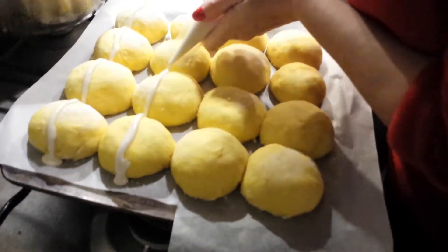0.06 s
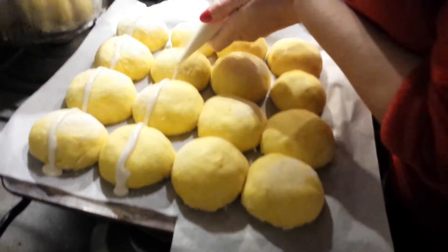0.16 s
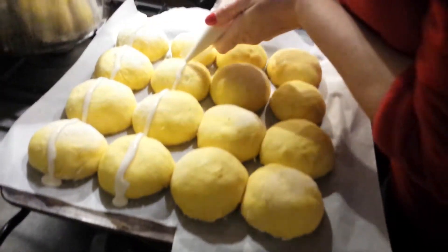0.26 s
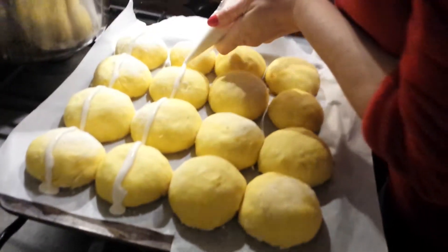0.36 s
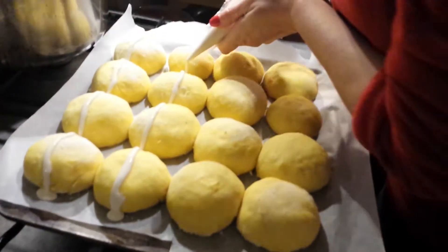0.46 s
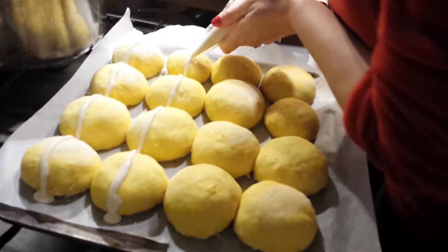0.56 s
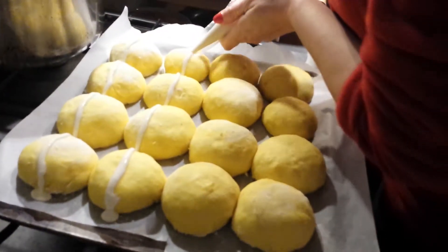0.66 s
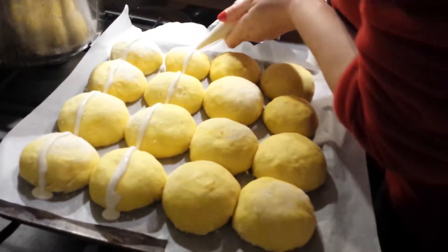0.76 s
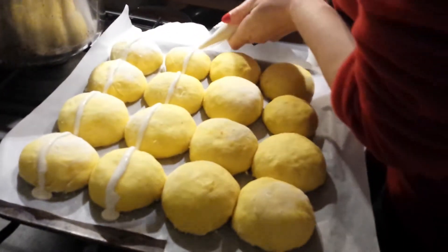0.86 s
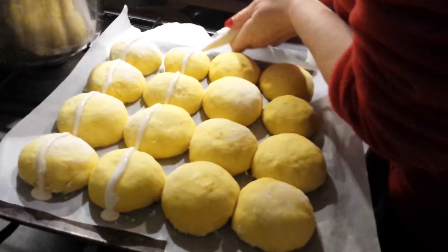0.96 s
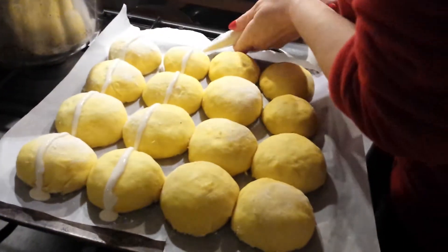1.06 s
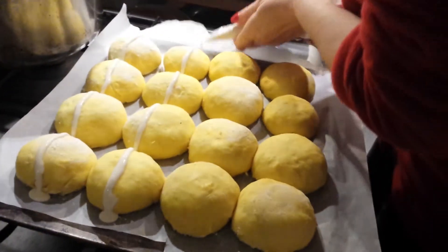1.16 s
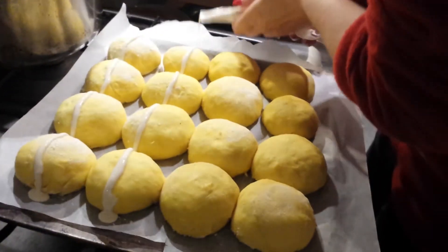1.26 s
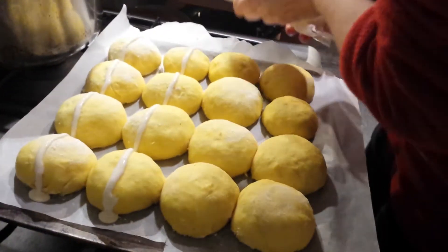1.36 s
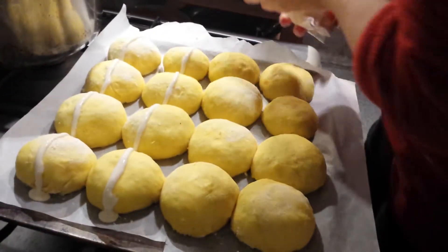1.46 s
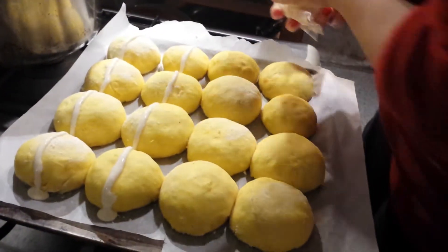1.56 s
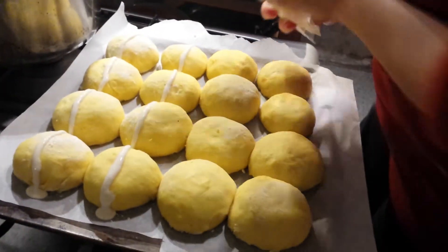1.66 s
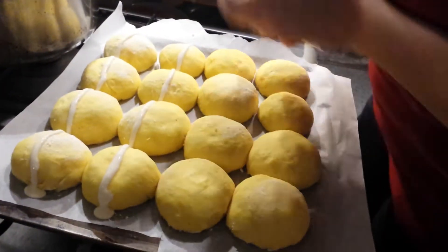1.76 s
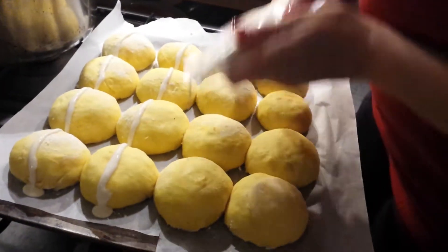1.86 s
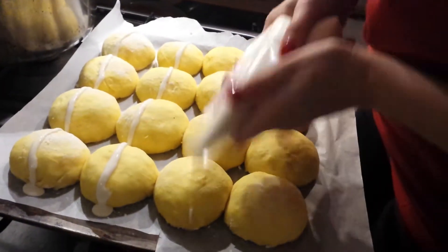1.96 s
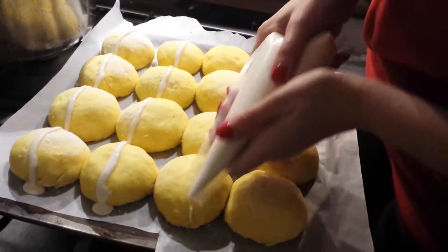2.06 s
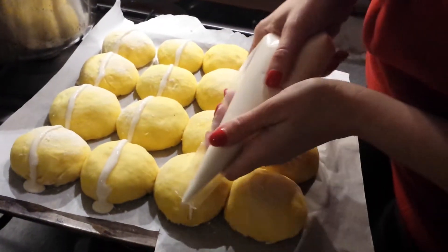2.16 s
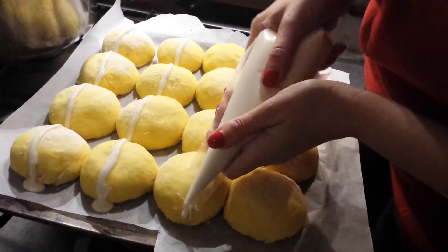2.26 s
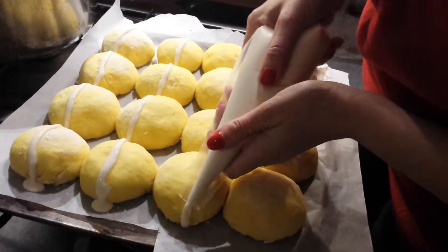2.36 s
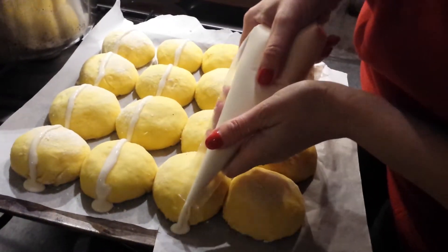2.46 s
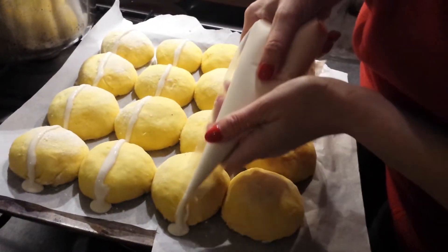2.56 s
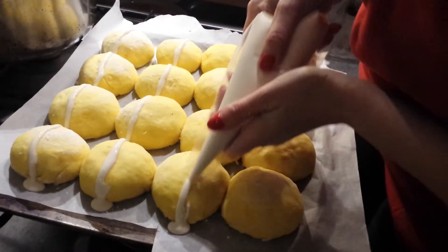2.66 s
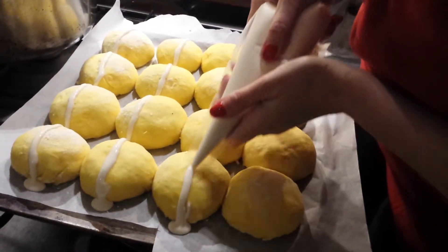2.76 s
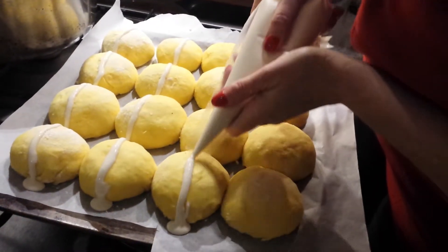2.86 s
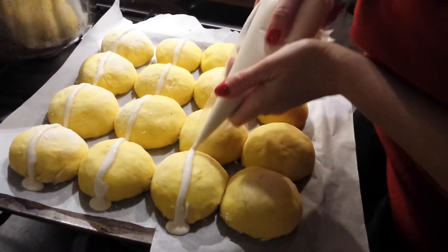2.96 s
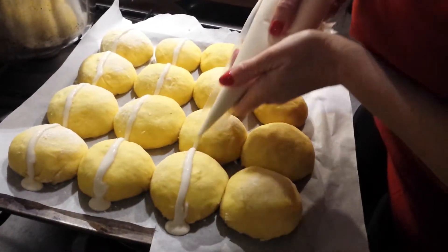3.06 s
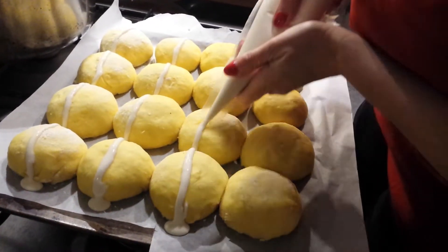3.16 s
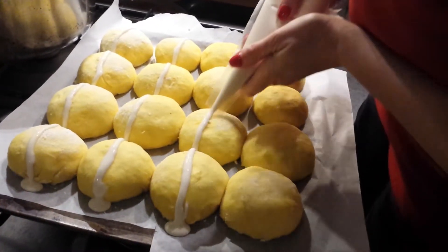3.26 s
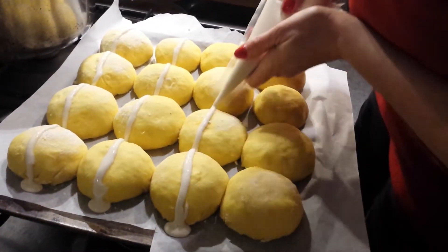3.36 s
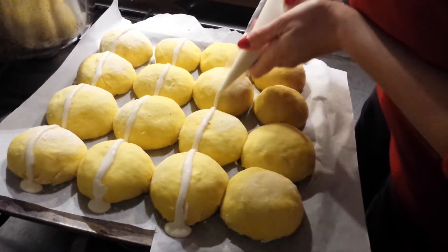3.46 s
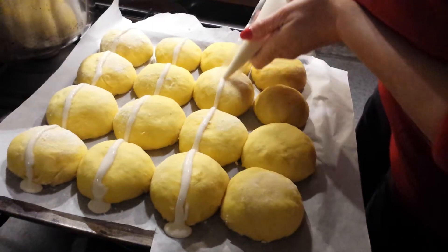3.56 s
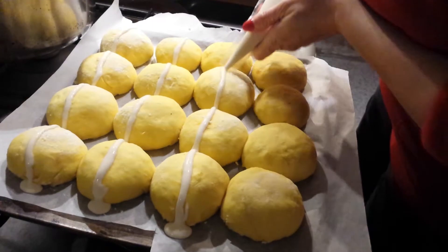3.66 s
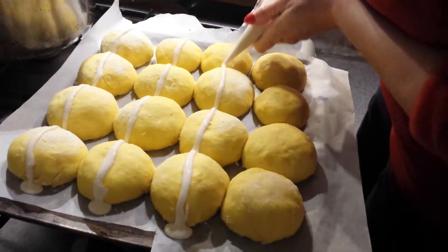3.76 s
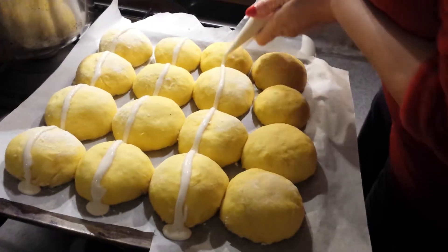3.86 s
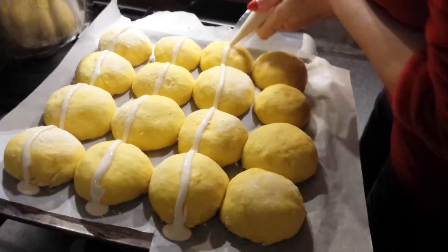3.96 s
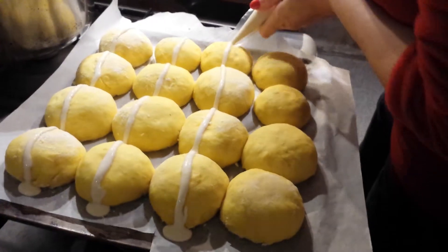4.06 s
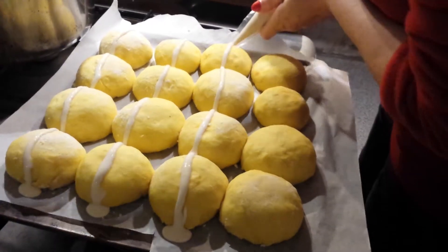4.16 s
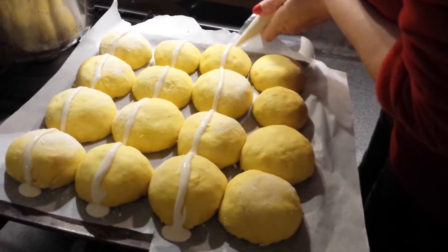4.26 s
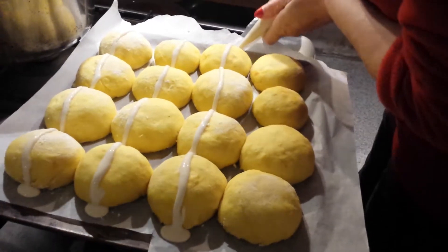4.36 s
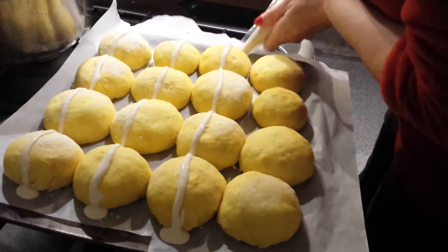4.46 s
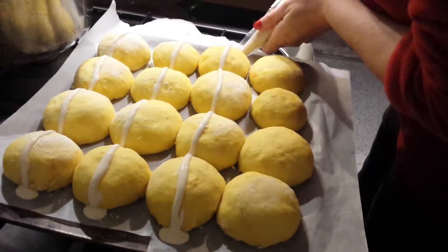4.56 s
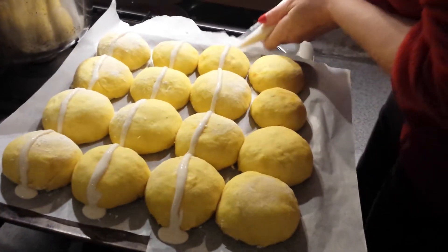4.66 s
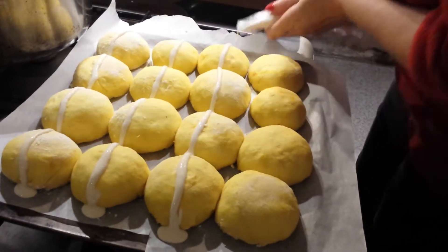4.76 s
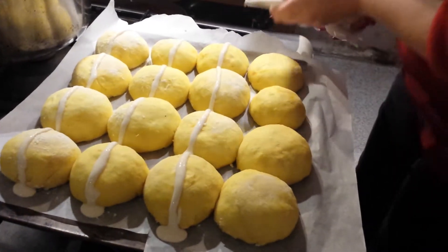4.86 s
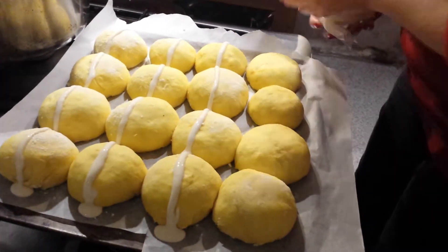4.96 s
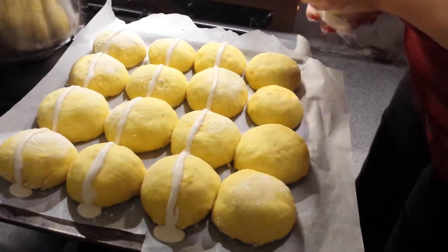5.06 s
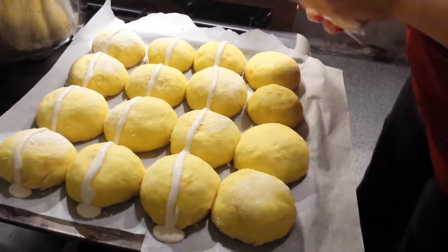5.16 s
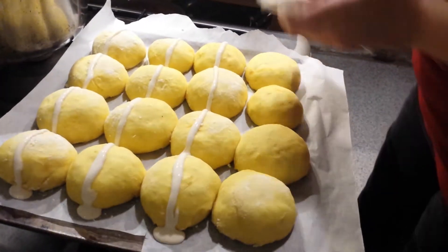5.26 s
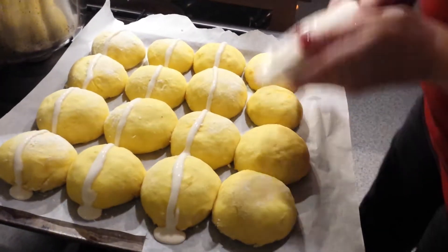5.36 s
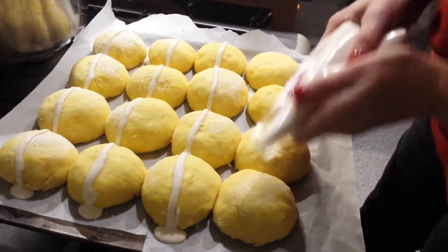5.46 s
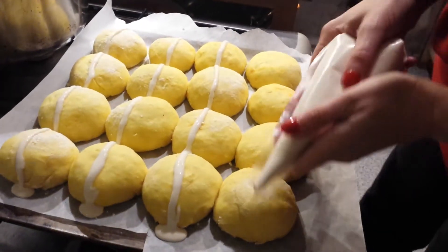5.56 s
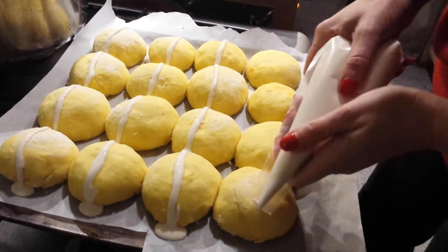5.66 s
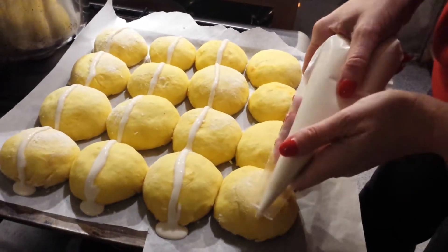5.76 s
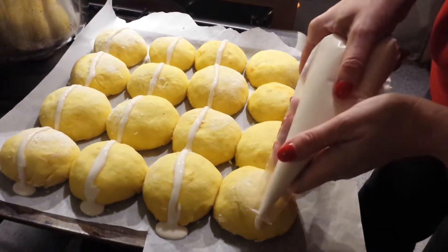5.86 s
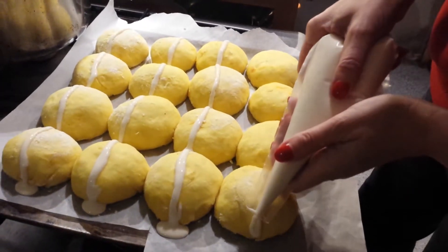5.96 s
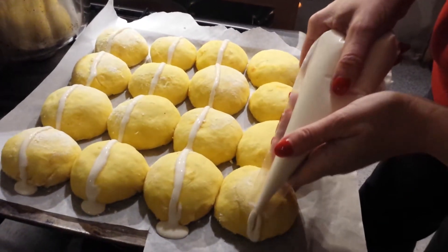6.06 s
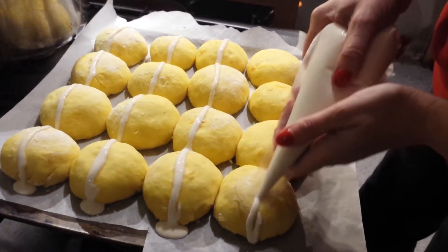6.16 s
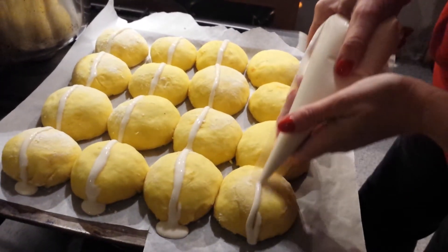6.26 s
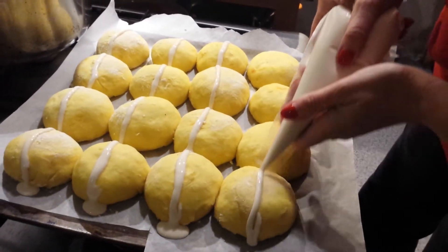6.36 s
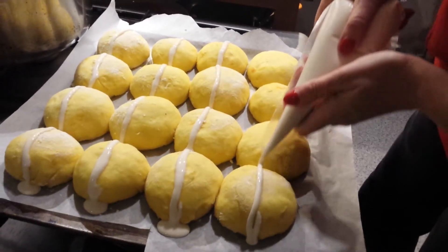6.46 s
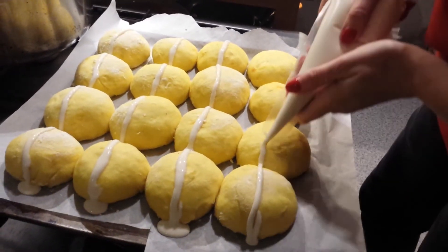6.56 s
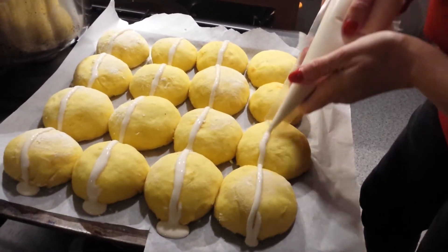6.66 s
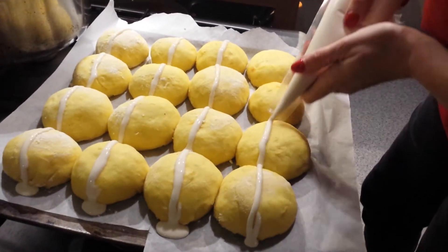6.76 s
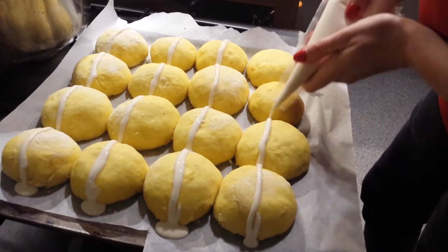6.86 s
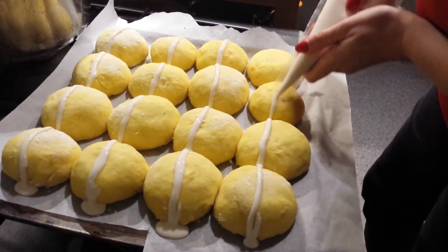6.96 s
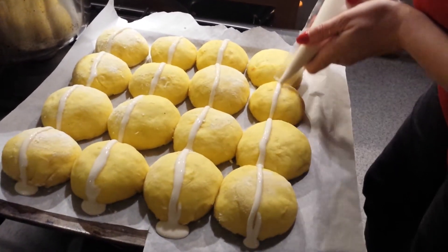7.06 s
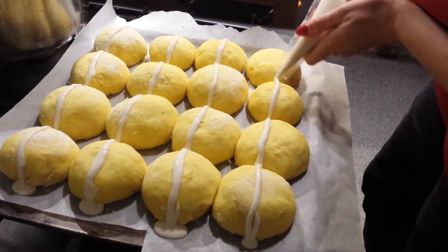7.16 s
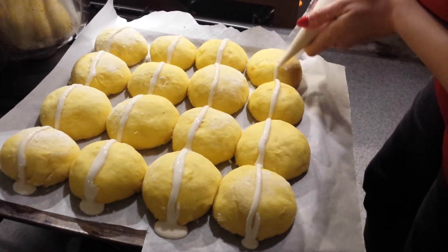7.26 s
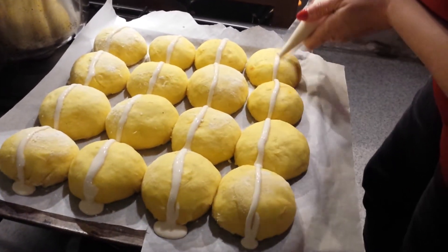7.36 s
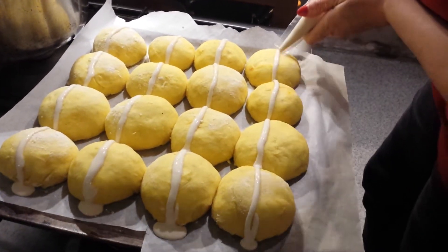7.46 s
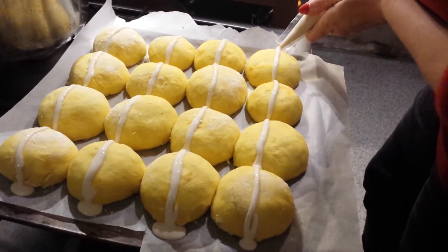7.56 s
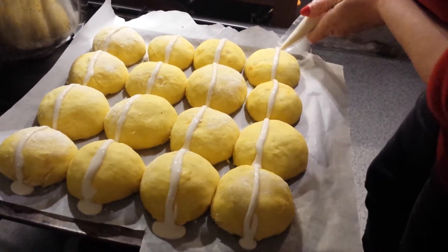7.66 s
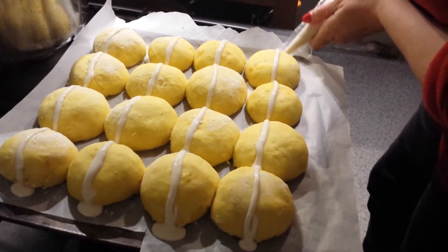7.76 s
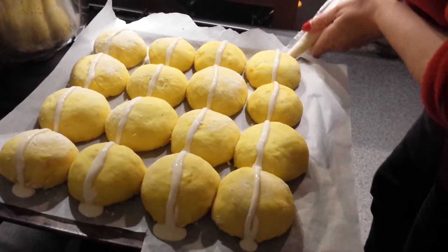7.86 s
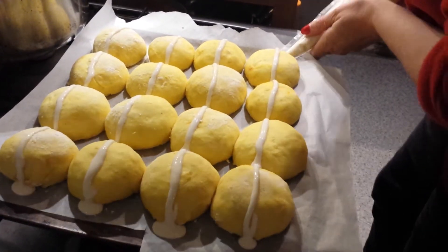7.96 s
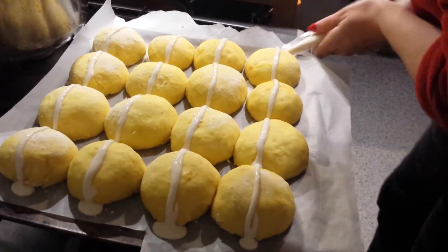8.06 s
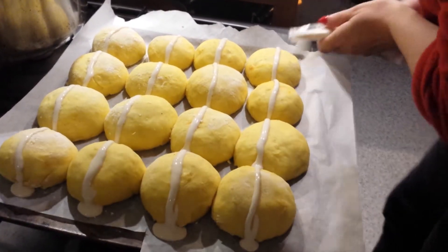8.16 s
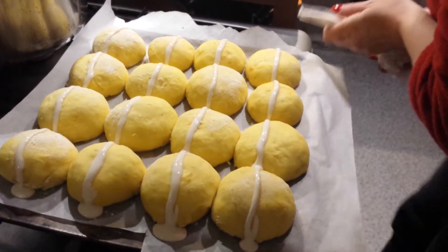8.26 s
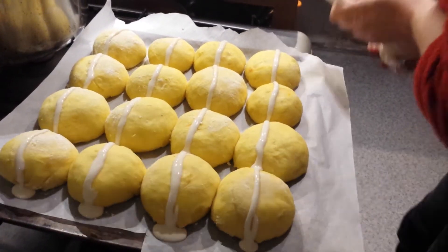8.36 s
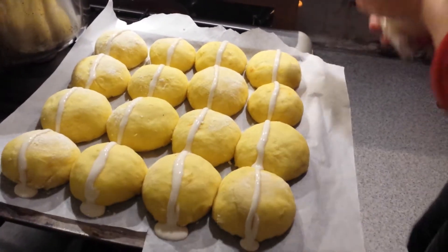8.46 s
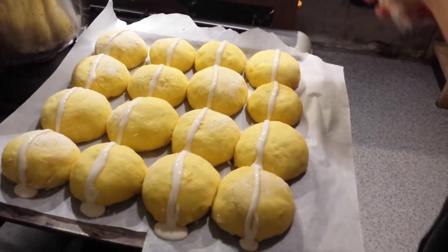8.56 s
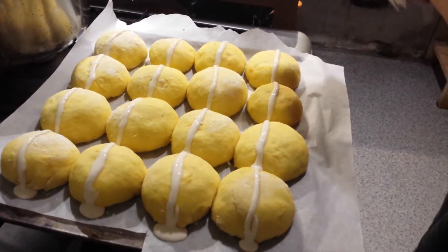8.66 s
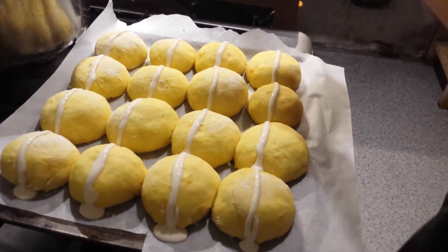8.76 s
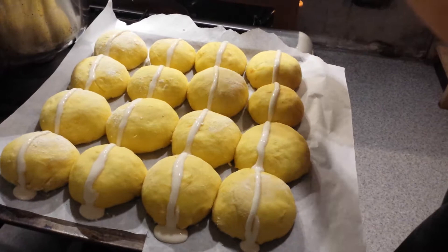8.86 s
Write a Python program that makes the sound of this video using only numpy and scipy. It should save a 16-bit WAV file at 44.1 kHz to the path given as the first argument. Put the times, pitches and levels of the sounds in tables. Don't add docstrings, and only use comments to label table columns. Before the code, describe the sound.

A quiet kitchen, heard close in stereo, with a faint mains motor hum and soft room tone that swell slightly when something moves. From 0 s, small plastic ticks and soft sleeve swishes. At about 1 to 1.3 s a short squeeze of plastic film crackles, one sharp crack over fine creasing. Sparse ticks and light cloth brushing follow, with a very soft worktop bump at 3.2 s. From 4.4 to 4.9 s a longer squeeze produces a dense run of bright cracks and crinkles; baking paper scrapes at 5.1 s and a dry snap follows at 5.25 s. Between 5.4 and 7.6 s only faint ticks, a light paper brush and gentle swishes. Crinkling returns at 7.9 s with a snap, building to the strongest, sharpest crackles around 8.15 to 8.3 s with a dull low thud. Paper drags briefly at 8.6 to 8.8 s, with last tiny ticks.

```python
import sys
import numpy as np
from scipy import signal
from scipy.fft import rfft, irfft
from scipy.io import wavfile
from scipy.ndimage import uniform_filter1d

SR = 44100
rng = np.random.default_rng(int(sys.argv[2]) if len(sys.argv) > 2 else 0)


def undo_db(level):
    steps = np.asarray(level, float) / 20
    return 10 ** steps


def transcribe(signal):
    frames = np.atleast_2d(signal).T
    limited = np.clip(frames, -1, 1)
    pcm = np.round(limited * 32767).astype(np.int16)
    wavfile.write(sys.argv[1], SR, pcm)


N = 392490
T = np.arange(N) / SR

# time in seconds, level at twice the mains in dB.
GATE_LEVEL = [(0.0, -78), (0.07, -74), (0.69, -84.5), (1.14, -69), (1.76, -84), (2.08, -78), (2.77, -80.5),
              (3.27, -74), (3.79, -83), (4.46, -72), (5.28, -71), (6.07, -86), (6.29, -78), (7.11, -78.5),
              (8.38, -67.5), (8.45, -71), (8.78, -65.5), (8.9, -76)]
# multiple of the mains frequency, level in dB.
HUM_PARTIALS = [(1, -3.5), (2, 0), (3, -5.5), (4, -8), (5, -16.5), (6, -10), (7, -12.5), (8, -12.5),
                (12, -12), (13, -11)]
# frequency in Hz, density in dB per Hz.
ROOM_COLOUR = [(18, -22), (30, -2), (48, -16.5), (86, -5.5), (161, -9.5), (540, -14.5), (649, -17),
               (866, -16.5), (2060, -15.5), (3220, -21), (5590, -19.5), (14800, -27), (16000, -27.5)]
# frequency in Hz, left minus right in dB.
PORT_LEAN = [(60, -7), (110, 0), (200, 3), (380, 15), (700, 4), (1290, 0.5), (2380, 10.5), (4400, 8.5),
             (8120, -4.5), (15000, -23.5)]
# frequency in Hz, density in dB per Hz.
SLEEVE_COLOUR = [(290, -27), (500, -16), (1350, -3), (1960, 4), (2900, -3), (3900, -17.5), (4670, -8),
                 (6120, -4.5), (15000, -16.5)]
# frequency in Hz, density in dB per Hz.
PAPER_COLOUR = [(290, -51), (500, -25), (800, -6.5), (1160, -8), (2230, 2), (3770, -9.5), (4230, -6.5),
                (5860, -0.5), (14000, -29.5), (15000, -32)]
# frequency in Hz, density in dB per Hz.
FILM_COLOUR = [(59, -36), (100, -12.5), (229, -12), (365, -24), (481, 6.5), (768, -11.5), (891, 2),
               (1170, -3), (1390, 4), (2860, -2.5), (5650, 2.5), (12900, -17), (16000, -22)]
# start in seconds, hold in seconds, dull level in dB,
# change over the hold in dB, bright minus dull in dB.
SLEEVE_SWISHES = [(0.04, 0.029, -66.5, -6, -8.5), (0.335, 0.038, -68, -6, -9),
                  (0.675, 0.39, -79.5, -3, 6.5), (1.72, 0.26, -78, -10, 4.5), (2.765, .17, -69, -8, -2),
                  (3.2, 0.09, -66, -8, -18), (3.595, 0.15, -82, 9, 8), (4.045, 0.28, -79.5, 0.5, 7),
                  (6.23, 0.15, -74, 6, 2), (7.12, 0.027, -70, -2.5, 3.5), (7.42, 0.21, -78.5, -5.5, 6),
                  (7.852, .24, -74, -3, 16)]
# time in seconds, peak in dB, pitch in Hz, 60 dB decay in seconds.
WORKTOP_BUMPS = [
    (3.197, -54, 231, 0.64),
    (3.21, -57, 456, 0.39),
    (3.288, -57, 258, .1),
    (8.23, -37.5, 237, 0.095),
    (8.241, -48.5, 69, 0.23),
    (8.253, -40.5, 471, 0.11),
    (8.36, -56, 288, 0.5),
]
# start in seconds, hold in seconds, dull level in dB,
# change over the hold in dB, bright minus dull in dB.
PAPER_DRAGS = [
    (5.12, 0.037, -55, -3, 8.5),
    (5.17, 0.091, -64, 0, 2),
    (5.675, 0.059, -68.5, 2.5, 8.5),
    (8.605, 0.075, -55, 0.5, -1),
    (8.67, 0.02, -54, 1, 6),
    (8.72, 0.076, -54.5, -1, 0),
]
# start in seconds, hold in seconds, dull creases in dB,
# change over the hold in dB, bright minus dull in dB.
FILM_CRUMPLES = [(0.93, 0.16, -74, 9.5, -1), (1.065, 0.091, -57.5, -7.5, 4.5), (1.21, .07, -57, -10, 2),
                 (4.3, 0.17, -77.5, 4.5, 5.5), (4.45, .08, -57, -7.5, 9), (4.535, .08, -55, 0, 5),
                 (4.615, 0.081, -49, -12, 4.5), (4.7, .15, -55, 4, -4), (4.86, 0.1, -64.5, -4, 4.5),
                 (5.0, 0.1, -78.5, 9, 1.5), (5.245, .04, -66, -10, -6), (7.853, 0.065, -64.5, 1.5, 2),
                 (7.92, .18, -63, -1.5, 1), (8.104, 0.059, -62.5, 8, 6), (8.175, 0.092, -52.5, -4, 3.5),
                 (8.25, 0.06, -50.5, -2, 8)]
# time in seconds, peak in dB, ringing in Hz, dull part in dB.
LONE_TICKS = [(0.0136, -50, 1260, -65), (0.0347, -70, 1440, -61), (0.0597, -41, 1330, -51.5),
              (0.351, -69, 1680, -64), (0.809, -71, 2300, -60), (1.509, -66, 1390, -58),
              (2.3472, -74, 840, -60.5), (2.4282, -48.5, 910, -61.5), (2.839, -57, 3750, -72),
              (2.8749, -48, 1950, -50.5), (2.9807, -43, 940, -46.5), (3.514, -73, 1980, -60),
              (3.5973, -54, 1880, -50), (4.327, -45.5, 2030, -56), (5.3646, -56, 2570, -49.5),
              (5.6181, -54, 1877, -72), (5.689, -66, 2620, -65), (5.9489, -61.5, 2050, -82),
              (6.0681, -62, 7390, -84), (6.122, -50, 2350, -54.5), (6.3768, -52, 2000, -55),
              (6.5834, -57, 6420, -78), (6.9124, -64, 1600, -56.5), (7.4057, -48.5, 1320, -59),
              (7.5288, -56, 5540, -75.5), (7.5565, -55, 6300, -68), (8.5145, -57, 6500, -75),
              (8.74, -60, 1300, -52), (8.7994, -46, 2420, -59), (8.8344, -58, 1880, -76)]
# time in seconds, peak in dB, ringing in Hz, dull part in dB.
DRY_SNAPS = [
    (4.596, -24, 4900, -29.5),
    (4.5794, -25, 4400, -32),
    (5.2405, -28, 5800, -35),
    (7.9117, -30.5, 3140, -44),
    (8.14, -26, 6300, -32.5),
]
# time in seconds, peak in dB, ringing in Hz, dull part in dB.
FIRST_BUCKLES = [
    (1.005, -48, 5830, -65),
    (1.0555, -47, 1460, -41),
    (1.062, -23, 4750, -28),
    (1.0866, -27.5, 1500, -31),
    (1.117, -46, 1450, -41),
    (1.2108, -34, 5060, -39),
    (1.2299, -36.5, 990, -39.5),
    (1.2464, -41, 880, -39),
    (1.3174, -51, 5100, -59),
]
SECOND_BUCKLES = [(4.4266, -42.5, 5620, -45.5), (4.4488, -50, 1850, -40), (4.4585, -21.5, 5730, -31),
                  (4.4747, -39, 4880, -45), (4.5327, -26, 2020, -29), (4.5416, -16.5, 4300, -36),
                  (4.5624, -28, 4100, -53), (4.6135, -21.5, 2400, -26), (4.6175, -19, 6300, -25.5),
                  (4.679, -39, 2240, -32.5), (4.7044, -30.5, 1560, -30.5), (4.7341, -36, 815, -31.5),
                  (4.7511, -25, 6360, -32.5), (4.7623, -51, 1660, -41), (4.7797, -28, 5900, -36),
                  (4.786, -26.5, 1900, -30.5), (4.7905, -22, 5700, -25.5), (4.818, -43, 950, -31.5),
                  (4.8442, -26, 5600, -31), (4.8536, -33.5, 5430, -28)]
RELEASE_BUCKLES = [
    (4.8895, -47, 5360, -51),
    (5.018, -53, 5540, -70),
    (5.0285, -51.5, 5670, -56.5),
    (5.0793, -50, 5630, -60),
    (5.1217, -40.5, 5800, -69),
    (5.2574, -50, 1960, -51),
]
THIRD_BUCKLES = [(7.8544, -49, 5070, -49), (7.95, -42, 1510, -40.5), (7.9985, -53, 1430, -45),
                 (8.024, -52, 2280, -43.5), (8.0385, -46, 1550, -43.5), (8.106, -37, 5700, -48),
                 (8.1281, -33, 1780, -40), (8.1625, -25.5, 2110, -31), (8.1884, -37, 1340, -36),
                 (8.2285, -21, 5900, -27), (8.232, -17.5, 5600, -21.5), (8.241, -23, 3980, -22.5),
                 (8.2547, -15, 6100, -25), (8.2635, -29, 5350, -24), (8.2824, -31, 1400, -41),
                 (8.2897, -25, 6500, -30), (8.3398, -39, 2100, -40)]

MAINS_HZ = 49.95
BODY_HZ, DULL_HZ, BRIGHT_HZ = (130, 800), (600, 3400), (3400, 17000)
SNAP_HZ, AIR_HZ = (3600, 9000), (9000, 17000)


def unit(x):
    return x / np.sqrt(np.mean(x ** 2))


def peak(x):
    return x / np.max(np.abs(x))


def band(x, edges_hz):
    return signal.sosfilt(signal.butter(2, edges_hz, "bandpass", fs=SR, output="sos"), x)


def lowpass(x, order, hz):
    return signal.sosfilt(signal.butter(order, hz, fs=SR, output="sos"), x)


def read_curve(rows):
    hz, db = np.array(rows).T
    return np.interp(np.log(np.arange(1, 1026) * SR / 2048), np.log(hz), db)


def colour(x, table, sides=0):
    db = read_curve(table) + sides * np.array([[0.5], [-0.5]]) * read_curve(PORT_LEAN)
    cepstrum = irfft(db * np.log(10) / 20)
    cepstrum[:, 1:1024] *= 2
    cepstrum[:, 1025:] = 0
    response = irfft(np.exp(rfft(cepstrum)))
    return signal.fftconvolve(x, response, axes=1)[:, :N]


def walk(rate):
    k = int(SR / rate)
    steps = np.repeat(rng.standard_normal(N // k + 1), k)
    return unit(uniform_filter1d(uniform_filter1d(steps, k), k)[:N])


def motor_hum(gate_db):
    hum = 0
    for k, db in HUM_PARTIALS:
        lag_db = 0 if k == 2 else 0.75 * (-76.5 - gate_db)
        level = undo_db(db + 1.7 * walk(5) + lag_db)
        hum = hum + level * np.sin(2 * np.pi * (k * MAINS_HZ * T + rng.random()))
    return np.sqrt(2) * undo_db(gate_db) * hum


def room_tone(gate_db, action):
    tone = undo_db(-69) * unit(colour(rng.standard_normal((2, N)), ROOM_COLOUR))
    low = lowpass(tone, 2, 900)
    middle = low.mean(axis=0)
    bass = middle + low * 0 + 0.38 * (low - middle) + 0.62 * (low - low) + (low - low.mean(axis=0)) * 0.62
    bass = low + 0.38 * (middle - low)
    hold = np.exp(-1 / (0.03 * SR))
    power = signal.lfilter([1 - hold], [1, -hold], np.mean(action ** 2, axis=0))
    action_db = 10 * np.log10(power + 1e-12)
    hiss_db = 7 * np.clip((action_db + 72) / 16, 0, 1) + 0.3 * walk(4)
    bass_db = 0.4 * (gate_db + 86) + 1.2 * walk(8.4)
    return bass * undo_db(bass_db) + (tone - low) * undo_db(hiss_db)


def background(action):
    gate_db = np.interp(T, *np.transpose(GATE_LEVEL))
    return motor_hum(gate_db) + room_tone(gate_db, action)


def kitchen(x, near_s=0.076, near_db=-7, far_s=0.28, far_db=-15):
    t = np.arange(SR // 2) / SR
    own, both = rng.standard_normal((2, 2, len(t))), rng.standard_normal((2, 1, len(t)))
    near, far = own + lowpass(both - own, 1, 700)
    far = signal.lfilter([0.6], [1, -0.4], far)

    def decay(noise, t60):
        fade = np.exp(-np.log(1000) * t / t60) * np.clip(t / 0.0033, 0, 1)
        return unit(noise * fade) / np.sqrt(len(t))

    echo = undo_db(near_db) * decay(near, near_s) + undo_db(far_db) * decay(far, far_s)
    return x + signal.fftconvolve(x, echo, axes=1)[:, :N]


def bumps():
    out, t = np.zeros(N + 20000), np.arange(20000) / SR
    for s, peak_db, hz, t60 in WORKTOP_BUMPS:
        fade = np.exp(-np.log(1000) * t / t60) * (1 - np.exp(-t / 0.0008))
        rumble = band(fade * rng.standard_normal(len(t)), (0.79 * hz, 1.106 * hz))
        out[int(s * SR):][:len(t)] += undo_db(peak_db) * peak(rumble)
    return out[:N]


def gains(rows, attack_s, release_db_s, body_db, body_release_db_s):
    out = np.zeros((3, N))
    for s, hold_s, db, change_db, bright_db in rows:
        span = slice(max(int((s - 0.1) * SR), 0), int((s + 1) * SR))
        t = T[span] - s
        held = db + change_db * np.clip(t / hold_s, 0, 1)
        after = np.maximum(t - hold_s, 0)
        rise = np.clip(t / attack_s + 1, 0, 1) ** 2
        dull = held - release_db_s * after
        bright = dull + bright_db
        body = held + body_db + max(bright_db, 0) / 2 - body_release_db_s * after
        out[:, span] = np.maximum(out[:, span], rise * undo_db(np.array([dull, bright, body])))
    return out


def creases(rate, spread_db, shared):
    size = undo_db(abs(spread_db) * np.minimum(rng.exponential(size=N), 3))
    hit = (rng.random(N) < rate / SR) * size
    puff = signal.lfilter([1], [1, -0.97], hit)
    return puff * (shared * rng.standard_normal(N) + rng.standard_normal((2, N)))


def bed(levels, table, rate, spread_db, shared, lean):
    dull, bright, body = levels
    grain = colour(creases(rate, spread_db, shared), table, sides=lean)
    low = 2.7 * rng.standard_normal(N) + rng.standard_normal((2, N))
    boom = unit(unit(band(low, BODY_HZ)) + 0.25 * unit(band(low, (210, 250))))
    return dull * unit(band(grain, DULL_HZ)) - bright * unit(band(grain, BRIGHT_HZ)) + body * boom


def sleeve_swish():
    levels = gains(SLEEVE_SWISHES, attack_s=0.022, release_db_s=350, body_db=-4, body_release_db_s=150)
    return bed(levels, SLEEVE_COLOUR, rate=4000, spread_db=8.5, shared=0.95, lean=0.43)


def paper_drag():
    levels = gains(PAPER_DRAGS, attack_s=0.013, release_db_s=306, body_db=-6.5, body_release_db_s=200)
    return undo_db(-5) * bed(levels, PAPER_COLOUR, rate=2200, spread_db=-1, shared=0.92, lean=0.54)


def film_crumple():
    levels = gains(FILM_CRUMPLES, attack_s=0.0072, release_db_s=304, body_db=-3, body_release_db_s=165)
    return bed(levels, FILM_COLOUR, rate=1500, spread_db=5, shared=0.59, lean=0.24)


def cracks(table, full_ms, side_db, ring_db, width, air_db, lag):
    out, t = np.zeros((2, N + 2048)), np.arange(1500) / SR
    for s, peak_db, hz, dull_db in table:
        ms = max(full_ms * (1 + 0.008 * peak_db), 0.1)
        pan_db = side_db + 1.5 * rng.standard_normal()
        fade = np.exp(-t * 1000 / ms) * np.clip(t * 1000 / (0.16 * ms), 0, 1)
        burst = rng.standard_normal((3, len(t))) * fade
        ring_level = undo_db(ring_db) * undo_db(peak_db if hz > 3000 else dull_db)
        ring = peak(band(burst[0], (hz * (1 - width), hz * (1 + width)))) * ring_level
        bright = peak(band(burst[1], SNAP_HZ)) * undo_db(peak_db)
        air = peak(band(burst[1] * np.exp(-t / 0.0034), AIR_HZ)) * undo_db(peak_db + air_db)
        dull = peak(band(burst[2], DULL_HZ)) * undo_db(dull_db)
        sound = dull - bright + air + ring
        start, late = int(s * SR), int(rng.integers(-lag, lag + 1))
        for side, sign in enumerate((1, -1)):
            at = start + max(sign * late, 0)
            out[side, at:at + len(t)] += sound * undo_db(sign * pan_db / 2)
    return out[:, :N]


def film_buckles():
    ticks = cracks(LONE_TICKS, 0.75, -0.32, ring_db=0, width=0.17, air_db=-16, lag=3.5)
    snaps = cracks(DRY_SNAPS, 1.2, 1.5, ring_db=-2.5, width=0.14, air_db=-11, lag=4.5)
    squeezes = [(FIRST_BUCKLES, 0.3), (SECOND_BUCKLES, -2.5), (RELEASE_BUCKLES, 7), (THIRD_BUCKLES, -1.5)]
    bag = sum(cracks(rows, 3.6, side_db, ring_db=-4.5, width=0.21, air_db=-2.5, lag=6)
              for rows, side_db in squeezes)
    softened = [(hz, 0.63 * db) for hz, db in FILM_COLOUR]
    return undo_db(2.5) * colour(bag + ticks + snaps, softened, sides=0.47)


def scene():
    action = kitchen(film_buckles() + film_crumple() + paper_drag() + bumps()) + sleeve_swish()
    return action + background(action)


def top_cut(x):
    return signal.sosfilt(signal.butter(12, 16520, fs=SR, output="sos"), x)


def record(dry):
    mix = signal.sosfilt(signal.butter(3, 45, "highpass", fs=SR, output="sos"), dry)
    mix = signal.sosfilt(signal.ellip(6, 0.3, 24, 15600, fs=SR, output="sos"), mix)
    return top_cut(mix)


dry = scene()
out = record(dry)
transcribe(out)
```